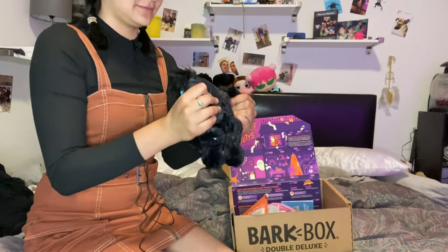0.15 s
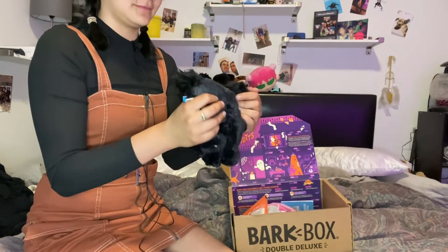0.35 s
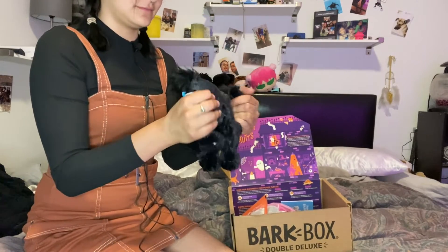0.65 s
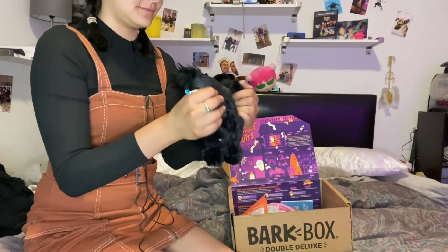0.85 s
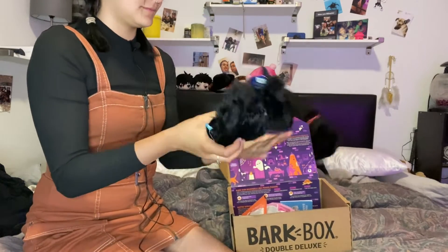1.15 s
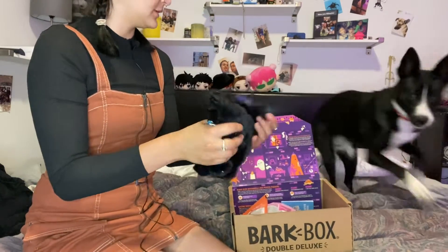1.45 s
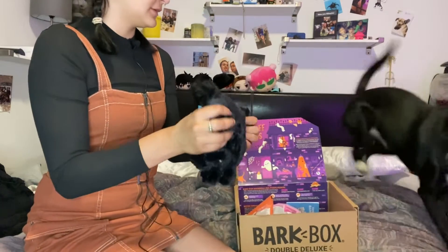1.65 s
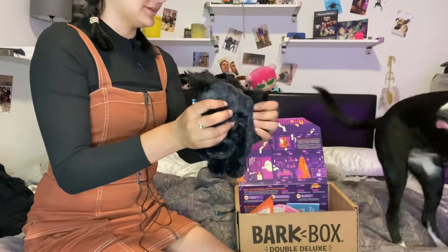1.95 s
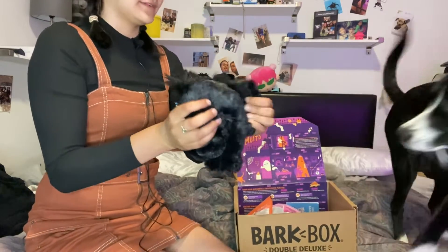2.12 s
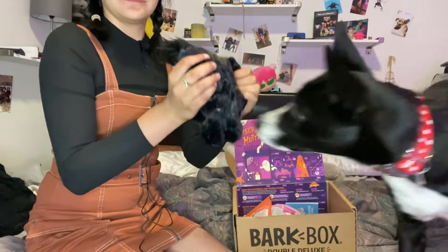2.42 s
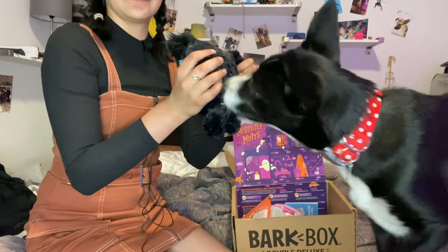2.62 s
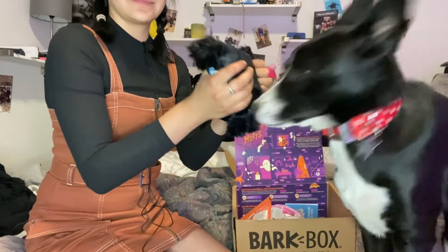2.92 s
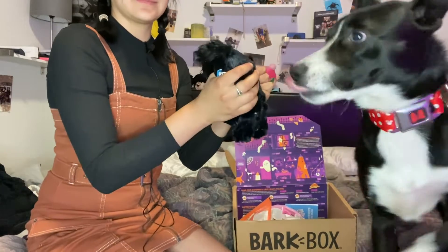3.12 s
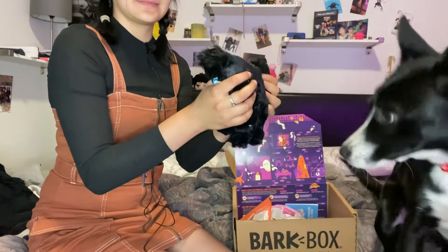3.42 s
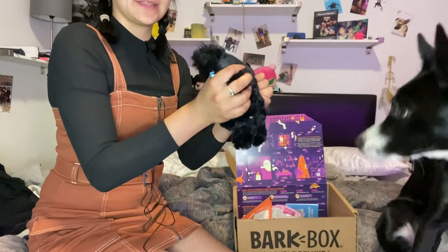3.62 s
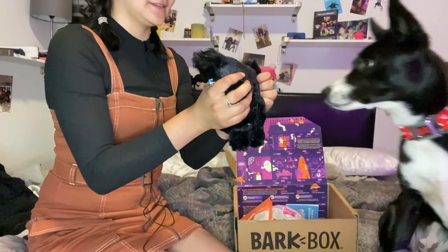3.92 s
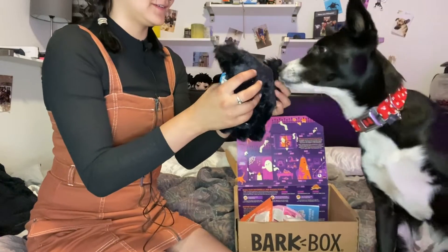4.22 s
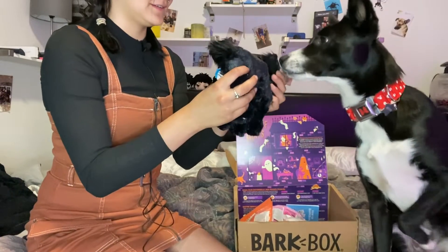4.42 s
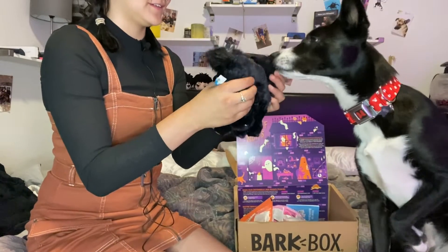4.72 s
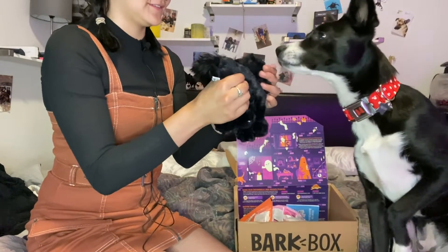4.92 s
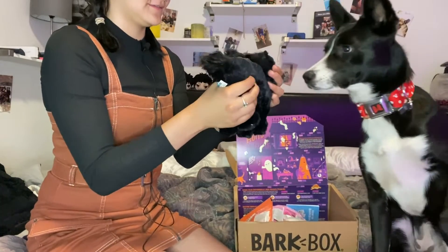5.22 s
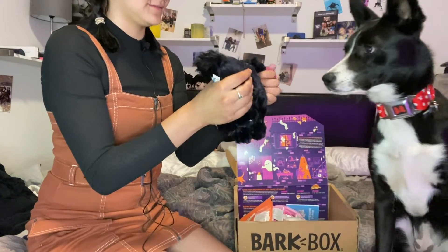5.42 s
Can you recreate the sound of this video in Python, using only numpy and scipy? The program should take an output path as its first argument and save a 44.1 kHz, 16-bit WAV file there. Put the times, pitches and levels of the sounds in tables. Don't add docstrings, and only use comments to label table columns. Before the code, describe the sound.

Close, nasal toy squeaks chirp out and wheeze back as a plush is kneaded on a bed, with small pops, ticks and faint paw rumble.

```python
import sys
import numpy as np
from scipy import signal
from scipy.fft import rfft, irfft
from scipy.io import wavfile
from scipy.ndimage import uniform_filter1d

SR = 44100
rng = np.random.default_rng(int(sys.argv[2]) if len(sys.argv) > 2 else 0)


def wav_out(sig):
    wavfile.write(sys.argv[1], SR, np.round(np.clip(np.atleast_2d(sig).T, -1, 1) * 32767).astype(np.int16))


def decibels_to_gain(level_db):
    exponent = np.asarray(level_db, float) / 20
    return 10 ** exponent


N = 244843

# (start [s], press [s], hold [s], let go [s], top pitch [Hz])
SQUEEZES = [
    (-.03, 0.038, .1, 0.087, 1363),
    (2.126, 0.072, 0.038, 0.047, 1400),
    (2.57, 0.046, 0.039, 0.044, 1371),
    (3.845, .028, 0.022, .042, 1330),
    (4.837, 0.019, 0.11, 0.025, 1042),
]
OUT_START, DOME, KNEE, OUT_END_HZ = 0.1, 0.01925, 0.46, 1000
# (time [s], pitch [Hz])
HARD_SQUEEZES = [
    [(0.519, 1060), (0.543, 1154), (0.561, 1337), (0.591, 1385), (0.636, 1340), (0.675, 1180),
     (0.735, 1056)],
    [(1.697, 1083), (1.733, 1650), (1.738, 1810), (1.748, 1953), (1.751, 2140), (1.802, 2090),
     (1.808, 1935), (1.829, 1366), (1.853, 1003)],
    [(3.523, 1110), (3.55, 1220), (3.584, 1752), (3.588, 1900), (3.606, 1966), (3.61, 2236), (3.626, 2110),
     (3.642, 1542), (3.668, 1012)],
    [(5.057, 1146), (5.108, 1226), (5.153, 1235), (5.183, 1015), (5.192, 1016)],
    [(5.367, 1034), (5.388, 1346), (5.445, 1376), (5.481, 1487), (5.511, 1150), (5.55, 1040)],
    [(2.949, 1111), (2.999, 1282), (3.029, 1263), (3.068, 1034), (3.072, 980)],
]
# (start [s], end [s], top pitch [Hz], pitch at the bulb's snap [Hz], last pitch [Hz])
REFILLS = [(0.242, 0.487, 1225, 1119, 1000), (0.799, 1.105, 1198, 1087, 980),
           (1.896, 2.09, 1206, 1115, 979), (2.358, 2.539, 1195, 1048, 970), (2.742, 2.91, 1152, 1059, 965),
           (3.118, 3.311, 1160, 1089, 960), (3.712, 3.822, 1171, 1150, 994),
           (3.991, 4.194, 1160, 1052, 965)]
IN_START_HZ, IN_RISE_S, RISE_BEND, SAG_BEND, SLUMP_BEND = 1085, 0.046, 1.574, 1.3, 1.3
# (time [s], pitch [Hz])
LATE_REFILL = [(5.503, 964), (5.52, 1026), (5.552, 1006)]

# (pitch [Hz], fundamental level [dB],
# then over it: 2nd partial [dB], 3rd-5th [dB], 6th and up [dB], air jet [dB])
OUT_LAW = [(1000, -28, -5.5, -8, 1.5, -25), (1150, -21, -2, -6.5, .3, -23),
           (1370, -15.5, -5, -14, -5.5, -28), (1630, -15, -1.5, -15, -16, -26),
           (2170, -13, -10, -23, -37, -28)]
IN_LAW = [(974, -27, -6, -13, -0.25, -18), (1085, -20.5, -5, -9.5, 0.53, -25.5),
          (1226, -14.5, -7.5, -15.5, 0.52, -21.5)]
# (level [dB], 2nd partial [dB], higher partials [dB], lift near 6 kHz [dB], lift above 10 kHz [dB])
OUT_GRIP = [(1.5, -6, 7.5, 1, -6), (0.14, -0.4, 1.3, 2, -0.5), (1.9, 0, -0.8, -2, 6),
            (2.3, -1, 0.7, 4.5, -8), (-2, 1.3, 4.5, 15, 4), (1.14, -3, 4, 5, 2.5), (1.5, -4, 2.5, 3, -8),
            (1.5, .3, 0, 4, -9), (-2, -8, -7.5, -6, 1), (0.8, 1.5, 5, 3, -3.5), (1.3, 0.5, 1, 3, 1)]
IN_GRIP = [(-0.11, -0.18, -0.4, 1, 8.5), (-0.73, 1.1, -0.7, -1, 5), (-1.1, -0.41, 2.5, -11.5, -3.5),
           (0.81, -1.1, -3.5, 5, 10.5), (1.36, 0.84, -4, -16, -5), (1.2, -0.09, -4, -7, 5.5),
           (1.3, 0.14, -4.5, 5.5, 2), (0.54, 0.1, -2.5, -18, -2)]
ATTACK_S, ATTACK_DB, RELEASE_S, RELEASE_DB = 0.042, 1, 0.016, -37.5
UPPER_DB, MIDDLE_SHARE = -20.5, 0.21

# (frequency [Hz], level [dB])
PIPE = [(1000, -11), (2500, 7), (4000, -4.5), (5200, -12.5), (6000, -18.5), (7000, -15), (8500, -14.5),
        (10500, -20), (13500, -26), (15500, -31.5)]
# (time [s], half-way partials over the fundamental [dB])
HALVING = [(1.75, -70), (1.758, -12.5), (1.797, -16.5), (1.806, -72)]
# (frequency [Hz], level [dB])
JET = [(300, -13), (1000, -3), (2500, 0), (5000, -11), (7000, -22), (10000, -20), (14000, -20),
       (16000, -25)]

# (time [s], peak level [dB], frequency [Hz], kick to the reed [Hz])
POPS = [(0.419, 3.5, 610, 107), (0.988, 6.8, 710, 106), (1.079, 9.5, 720, 146.5), (1.326, -2, 410, 0),
        (2.032, 2, 533, 92.5), (2.249, -31, 400, 36), (2.517, -2.5, 370, 69), (2.892, -29, 400, 43),
        (3.245, -13, 400, 65), (3.55, -18, 204, -1), (3.777, -45, 400, -3), (4.134, -8.5, 493, 83),
        (4.678, -19, 206, 0), (5.479, -37, 300, 14.5)]
KICK_RISE_S, KICK_FALL_S, KICK_SHARE = 0.00738, 0.014, 0.7
# (time [s], peak level [dB], frequency [Hz])
SNAPS = [(1.128, -22, 850), (1.153, -39, 1140), (1.2088, -28.5, 1060), (1.3068, -24, 1260),
         (1.4139, -31, 830), (1.6728, -45.5, 1480), (3.43, -27.5, 2460), (3.465, -26, 2630),
         (4.261, -26, 1250), (4.2774, -26, 1020), (4.2884, -24, 2680), (4.3297, -32, 1590),
         (4.3973, -29, 1910), (4.5243, -29, 1500), (4.585, -39, 980), (4.6133, -35, 2800),
         (4.6464, -34, 1160), (4.66, -33, 990), (4.6765, -19, 1160), (4.6916, -29, 1180),
         (4.7103, -32, 1120), (4.7206, -17.5, 1370), (4.763, -20, 3490), (5.2768, -36, 810),
         (5.3033, -31, 1560)]
# (time [s], peak level [dB])
TICKS = [(1.0338, -20.5), (1.117, -22), (1.2094, -36), (1.3233, -28), (1.478, -33), (1.6164, -25),
         (3.3702, -29.5), (3.4097, -25), (4.2295, -24.5), (4.2447, -22.5), (4.277, -21), (4.3045, -26),
         (4.3963, -28), (4.539, -24.5), (4.6136, -36), (4.6383, -33), (4.6583, -25), (4.6922, -18.5),
         (4.7042, -24), (4.7105, -20), (4.7203, -13.5), (4.8343, -19), (5.0297, -38), (5.2125, -28),
         (5.265, -36)]

# (middle [s], length [s], rustle level [dB], fizz level [dB])
STROKES = [(0.204, 0.036, -1.5, -6), (0.755, 0.053, -4, -23), (2.313, 0.075, -8, -4), (1.3, 0.17, -6, -11),
           (1.5, 0.12, 1, 5.5), (1.587, 0.073, -0.5, -7), (1.67, 0.078, 8.5, 13), (3.402, 0.26, -5.5, -5.5),
           (3.52, 0.06, 7.5, 11.5), (4.292, 0.076, -9.5, -17), (4.518, 0.26, -14, -26), (4.754, 0.23, 4, 4),
           (5.017, .12, -12, -4.5), (5.25, 0.054, -9, -16), (5.347, 0.067, 4, 4.5)]
RUSTLE_DB, FIZZ_DB = -42.5, -45
# (frequency [Hz], level [dB])
FUR = [(100, -71), (250, -6.5), (600, 0), (1500, 3), (3500, -3.5), (5000, -11), (9000, -34)]
FIZZ = [(3000, 12), (5500, 2), (14000, 2), (16000, -12)]

# (time [s], rumble level [dB])
SHAKING = [(0, -55.5), (0.9, -40.5), (1.35, -29), (1.5, -29), (2, -41), (2.9, -45), (3.95, -42),
           (4.3, -45.5), (5.1, -54.5), (5.4, -44), (5.55, -46)]
SWAY_DB, SWAY_SHARE = -24, 0.63
# (frequency [Hz], level [dB])
RUMBLE = [(15, 7.5), (45, -3), (65, -12.5), (95, -13), (200, -21), (500, -47)]
SWAY = [(.5, -81), (2, 10), (7.5, 10), (10, 4), (20, -39), (35, -12.5), (60, -38), (200, -99)]
# (time [s], peak level [dB], frequency [Hz])
STEPS = [(1.369, -22, 88), (1.509, -33, 121), (2.142, -40, 70), (2.9, -34, 98), (3.552, -34, 69.4),
         (3.925, -38, 98.5), (4.42, -39, 131)]

# (frequency [Hz], level [dB], 60 dB decay [s])
TAG = [(9400, 1.5, 0.12), (9100, -10, .04), (14700, -2, .06), (15290, -9, 0.33)]
# (time [s], level [dB])
TAG_HITS = [
    (1.16, -65),
    (1.336, -43.5),
    (1.412, -48),
    (1.52, -59),
    (1.59, -50),
]

# (frequency [Hz], 60 dB decay [s])
ROOM_T60 = [(500, 0.18), (2500, 0.27), (8000, 0.31)]
ROOM_DB = -12.5
# (frequency [Hz], level [dB])
HISS = [(50, 23), (200, -23), (900, -5), (4000, -53), (8000, -61), (16000, -29)]
HISS_DB = -50


def evened(x):
    return x / np.sqrt(np.mean(x ** 2) + 1e-20)


def read(points, hz):
    f, value = np.transpose(points)
    return np.interp(np.log(hz + 1), np.log(f + 1), value)


def curves(rows, t):
    s, *columns = np.transpose(rows)
    return [np.interp(t, s, c) for c in columns]


def add(mix, s, sound):
    part = mix[round(s * SR):][:len(sound)]
    part += sound[:len(part)]


def coloured(x, points):
    hz = np.fft.rfftfreq(2 * len(x), 1 / SR)
    spectrum = rfft(x, 2 * len(x)) * decibels_to_gain(read(points, hz))
    return evened(irfft(spectrum)[:len(x)])


def drift(shape, seconds):
    size = max(int(seconds * SR), 2)
    once = uniform_filter1d(rng.standard_normal(shape), size)
    return evened(uniform_filter1d(once, size))


def wavelet(hz, turns):
    phase = np.arange(int(4 * turns * SR / hz) + 2) * hz / SR
    return np.sin(2 * np.pi * phase) * np.exp(-phase / turns)


def squeeze(start, press, hold, let_go, top_hz):
    s = start + np.cumsum([0, press, hold / 2, hold / 2, let_go / 2, let_go / 2])
    climb_hz = top_hz - OUT_END_HZ
    shoulder = 1 - DOME * top_hz / (climb_hz + 100)
    share = np.array([OUT_START, shoulder, 1, shoulder, KNEE, 0])
    return np.transpose([s, OUT_END_HZ + share * climb_hz])


def refill(start, end, top_hz, snap_hz, last_hz):
    snap = min(row[0] for row in POPS if row[0] > start)
    top = start + IN_RISE_S
    s = np.arange(start, end, 0.004)
    rise = (top_hz - IN_START_HZ) * np.clip((top - s) / IN_RISE_S, 0, 1) ** RISE_BEND
    sag = (top_hz - snap_hz) * (1 - np.clip((snap - s) / (snap - top), 0, 1) ** SAG_BEND)
    slump = (snap_hz - last_hz) * (1 - np.clip((end - s) / (end - snap), 0, 1) ** SLUMP_BEND)
    return np.transpose([s, top_hz - rise - sag - slump])


def reed_kick(t):
    kick = np.zeros(len(t))
    for s, _, _, kick_hz in POPS:
        kick += kick_hz * np.exp(np.minimum((t - s) / KICK_RISE_S, -(t - s) / KICK_FALL_S))
    return uniform_filter1d(kick, size=110)


def reed_tone(hz, strain, second_db, middle_db, upper_db, top_db, dip_db, air_db):
    slide = np.gradient(strain) * SR
    pulled = np.maximum(strain, 0)
    ragged = 0.001 + (0.003 + 0.0016 * abs(slide)) * pulled
    hz = hz * (1 + ragged * drift(len(hz), 0.003))
    turns = np.cumsum(hz) / SR
    k = np.arange(1, 16)[:, None]
    grip = [(4500, 0.0074), (6200, dip_db), (8500, 0), (11000, air_db)]
    gains = decibels_to_gain(read(PIPE, k * hz) + read(grip, k * hz)) * (k * hz < 16300)
    gains[0], gains[1] = 1, decibels_to_gain(second_db)
    middle, upper = gains[2:5], gains[5:]
    middle *= decibels_to_gain(middle_db + MIDDLE_SHARE * top_db) / np.sqrt((middle ** 2).sum(0))
    upper *= decibels_to_gain(UPPER_DB + upper_db + top_db) / np.sqrt((upper ** 2).sum(0))
    waver_db = np.minimum(0.3 + 0.12 * k ** 2, 4) * (1 + 0.8 * pulled)
    gains *= decibels_to_gain(waver_db * drift(gains.shape, 0.015))
    gains[3:] *= 1 + np.clip(-0.09 * slide, 0, 0.7) * drift(gains[3:].shape, 0.0012)
    phase = k * turns + rng.random(k.shape)
    tone = (gains * np.cos(2 * np.pi * phase)).sum(0)
    return tone, hz, turns


def strong_weak_beat(t, hz, turns):
    halves = np.arange(1, 6)[:, None] - 0.5
    gains = decibels_to_gain(curves(HALVING, t)[0] + read(PIPE, halves * hz))
    return (gains * np.cos(2 * np.pi * halves * turns)).sum(0)


def air_jet(t, strain, jet_db):
    onset = np.minimum(1, (t - t[0]) / 0.015)
    flutter_db = 1.7 * drift(len(t), 0.0055)
    jet = coloured(rng.standard_normal(len(t)), JET) * onset
    jet *= decibels_to_gain(jet_db + 1.33 * strain + flutter_db)
    return jet + 5 * np.maximum(strain, 0) * np.gradient(jet)


def squeak(pitch, law, level_db, second_db, top_db, dip_db, air_db, attack_s=ATTACK_S, attack_db=ATTACK_DB):
    start, end = pitch[0][0], pitch[-1][0]
    t = np.arange(max(start, 0), end + RELEASE_S, 1 / SR)
    hz = curves(pitch, t)[0]
    hz = uniform_filter1d(hz, size=120 if hz.max() > 1700 else 400)
    kick = reed_kick(t)
    law_db, law_second_db, middle_db, upper_db, jet_db = curves(law, hz + KICK_SHARE * kick)
    swell_db = np.interp(t, [start, start + attack_s, end, end + RELEASE_S], [attack_db, 0, 0, RELEASE_DB])
    hz = hz + 1.2 * kick
    strain = np.log2(hz / 1150)
    tone, hz, turns = reed_tone(hz, strain, second_db + law_second_db, middle_db, upper_db,
                                top_db, dip_db, air_db)
    tone += strong_weak_beat(t, hz, turns)
    sound = np.sqrt(2) * tone + air_jet(t, strain, jet_db)
    fade_in = np.minimum(1, (t - start + 0.00066) / 0.0044)
    return t[0], decibels_to_gain(level_db + law_db + swell_db) * sound * fade_in


def squeaker():
    out = np.zeros(N)
    outward = [squeeze(*row) for row in SQUEEZES] + HARD_SQUEEZES
    for pitch, grip in zip(outward, OUT_GRIP):
        add(out, *squeak(pitch, OUT_LAW, *grip))
    for row, grip in zip(REFILLS, IN_GRIP):
        add(out, *squeak(refill(*row), IN_LAW, *grip))
    add(out, *squeak(LATE_REFILL, IN_LAW, 0.3, 3, 6, 2.5, 0.3, attack_s=0.04, attack_db=-9))
    return out


def grains(per_s, spread_db, samples, bed_share):
    sizes = decibels_to_gain(spread_db * np.minimum(rng.exponential(1, N), 5)) * (rng.random(N) < per_s / SR)
    burst = signal.oaconvolve(sizes, np.exp(-np.arange(400) / samples))[:N]
    return rng.standard_normal(N) * (bed_share + evened(burst))


def plush():
    t = np.arange(N) / SR
    rustle_db, fizz_db = np.full(N, float(RUSTLE_DB)), np.full(N, float(FIZZ_DB))
    for s, length, stroke_rustle_db, stroke_fizz_db in STROKES:
        stroke = np.exp(-(2 * (t - s) / length) ** 4)
        rustle_db += stroke_rustle_db * stroke
        fizz_db += stroke_fizz_db * stroke
    rustle = coloured(grains(per_s=400, spread_db=3.5, samples=22, bed_share=0.4), FUR)
    fizz = coloured(grains(per_s=300, spread_db=3, samples=12, bed_share=0.5), FIZZ)
    rustle *= decibels_to_gain(rustle_db + 2.67 * drift(N, 0.0077))
    fizz *= decibels_to_gain(fizz_db + 1.66 * drift(N, 0.042))
    return rustle + fizz


def bed():
    rumble_db = curves(SHAKING, np.arange(N) / SR)[0]
    sway_db = SWAY_DB + SWAY_SHARE * (rumble_db + 44)
    rumble = coloured(rng.standard_normal(N), RUMBLE) * decibels_to_gain(4 * drift(N, 0.03))
    sway = coloured(rng.standard_normal(N), SWAY)
    out = decibels_to_gain(sway_db) * sway + decibels_to_gain(rumble_db) * rumble
    for s, db, hz in STEPS:
        add(out, s, decibels_to_gain(db) * wavelet(hz, turns=1.8))
    return out


def hiss():
    return decibels_to_gain(HISS_DB) * coloured(rng.standard_normal(N), HISS)


def room(x):
    taps = np.zeros(SR // 2)
    at = np.arange(200, len(taps) - 20, 20)
    taps[at + rng.integers(0, 20, len(at))] = rng.choice([-1.0, 1.0], len(at))
    hz, t, z = signal.stft(taps, SR, nperseg=256)
    decay = decibels_to_gain(-60 * t / read(ROOM_T60, hz)[:, None])
    tail = signal.istft(z * decay, SR, nperseg=256)[1]
    return signal.fftconvolve(x, tail / np.linalg.norm(tail))[:N]


def bulb_pops():
    out = np.zeros(N)
    for s, db, hz, _ in POPS:
        add(out, s - 0.0005, decibels_to_gain(db - 11) * wavelet(hz, turns=0.41))
    return out


def hair_ticks():
    out = np.zeros(N)
    fade = np.exp(-np.arange(50) / 13.5)
    for s, db in TICKS:
        grit = rng.standard_normal(50) * fade
        add(out, s, decibels_to_gain(db - 2) * np.convolve(grit, [1, -1]))
    return out


def seam_snaps():
    out = np.zeros(N)
    for s, db, hz in SNAPS:
        add(out, s, decibels_to_gain(db + 6) * wavelet(hz, turns=0.8))
    return out


def tag():
    t, out = np.arange(12000) / SR, np.zeros(N)
    for s, hit_db in TAG_HITS:
        for hz, db, t60 in TAG:
            add(out, s, decibels_to_gain(hit_db + db - 60 * t / t60) * np.sin(2 * np.pi * hz * t))
    return out


def scene():
    near = squeaker() + bulb_pops() + hair_ticks() + seam_snaps() + tag()
    mono = near + decibels_to_gain(ROOM_DB) * room(near) + plush() + bed() + hiss()
    return np.array([mono, mono])


def top_cut(x):
    return signal.sosfilt(signal.butter(12, 16530, fs=SR, output="sos"), x)


def record(dry):
    edge = signal.firwin(255, 15840, window=("kaiser", 7), fs=SR)
    padded = np.pad(dry, ((0, 0), (127, 127)), "edge")
    mix = signal.oaconvolve(padded, edge[None], "valid")
    return top_cut(mix)


dry = scene()
out = record(dry)
wav_out(out)
```